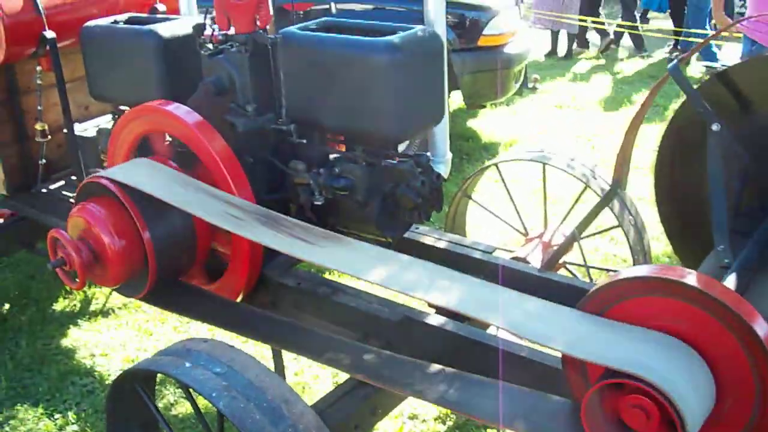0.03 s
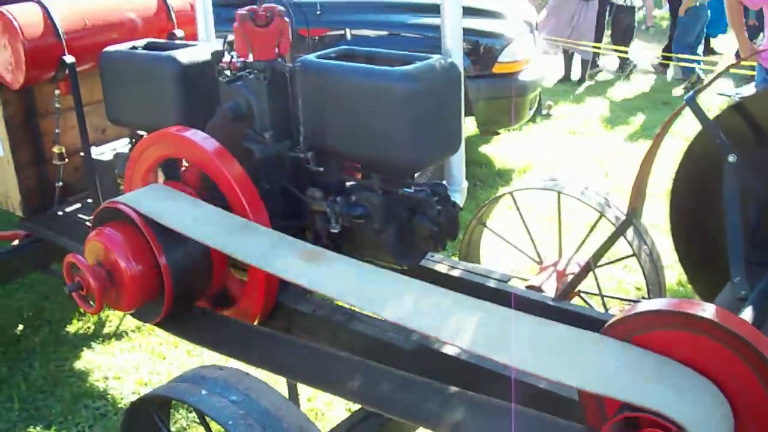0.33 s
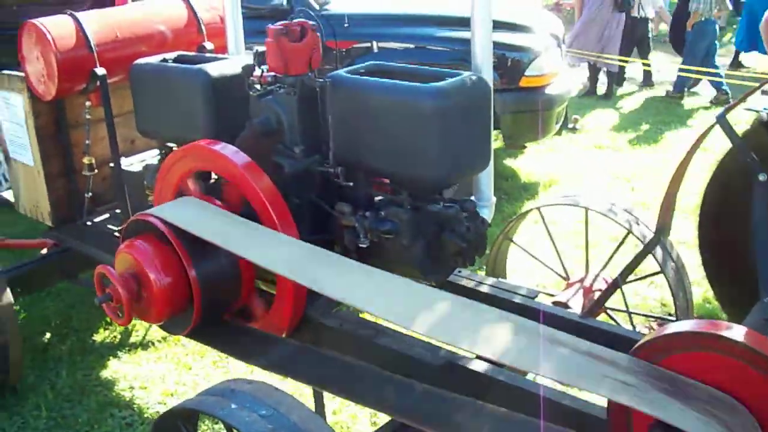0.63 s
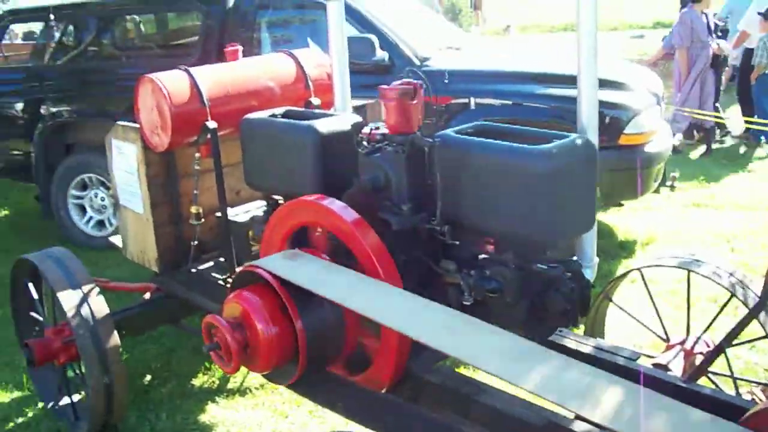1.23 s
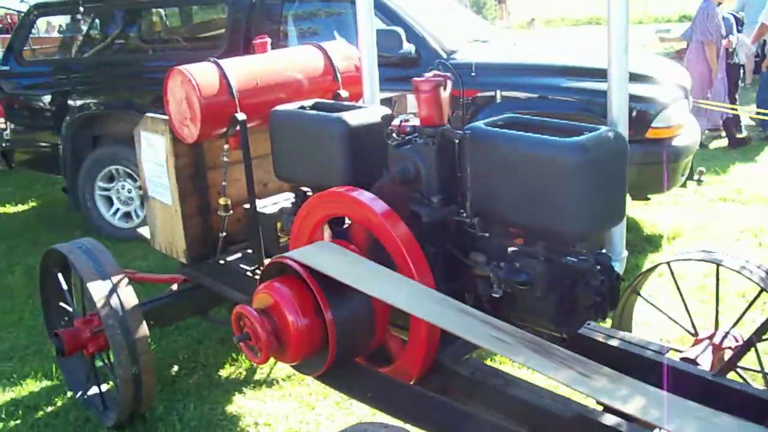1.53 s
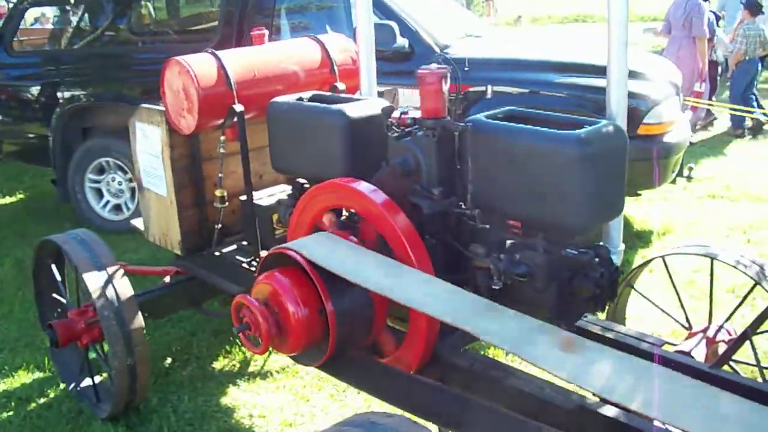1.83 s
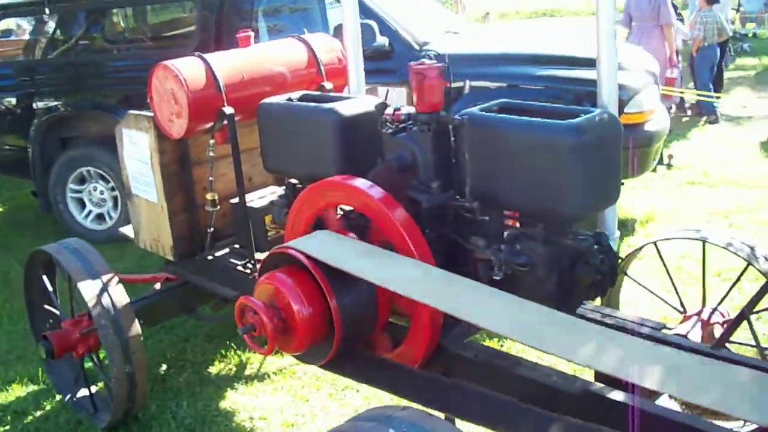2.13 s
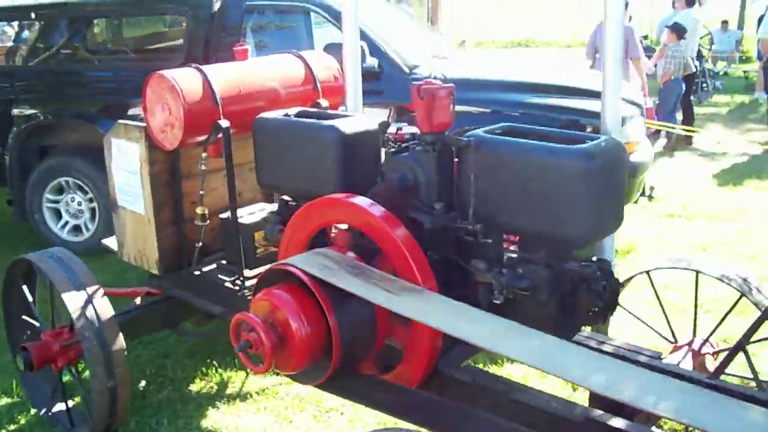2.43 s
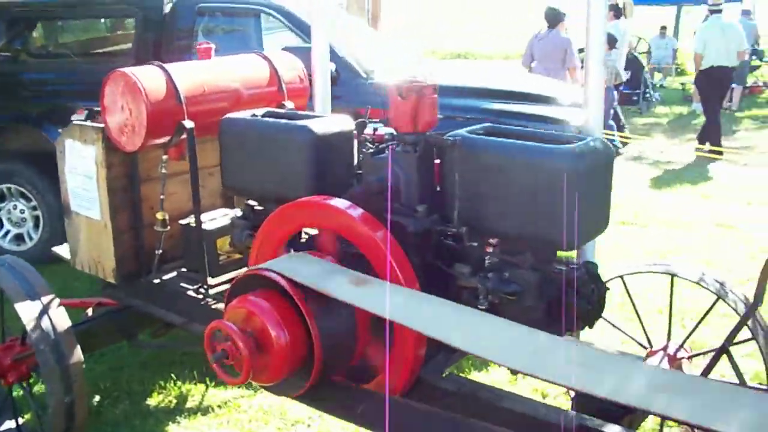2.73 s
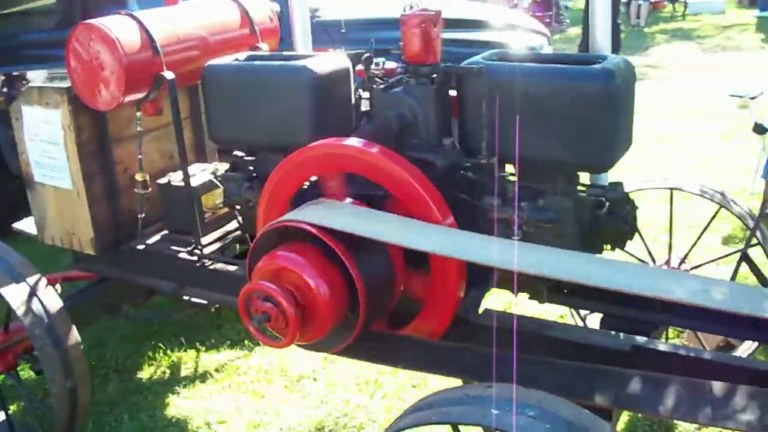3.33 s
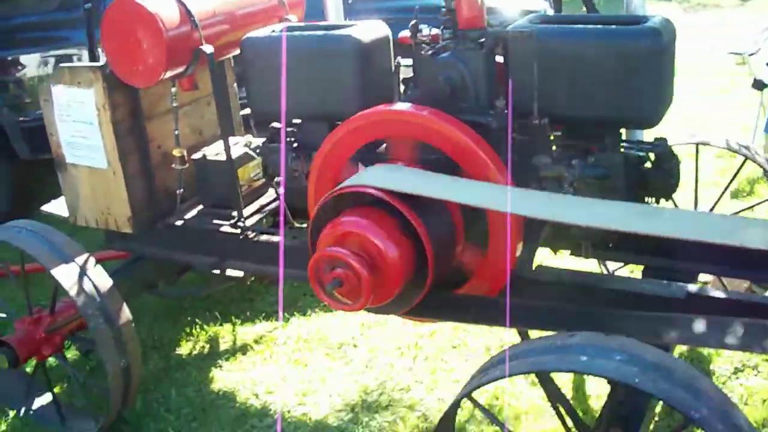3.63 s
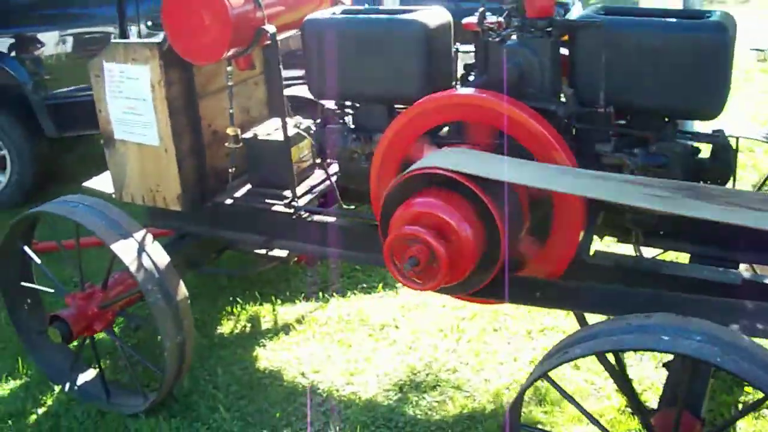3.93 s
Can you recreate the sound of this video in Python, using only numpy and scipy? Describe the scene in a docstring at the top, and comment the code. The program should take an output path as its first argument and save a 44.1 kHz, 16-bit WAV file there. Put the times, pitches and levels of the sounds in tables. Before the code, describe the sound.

An old single-cylinder engine chugs close by outdoors, with sharp, regular cracks and clatter.

```python
"""An old single-cylinder engine chugs close by in a field, driving a flat belt at about 400 turns a minute.
From the start the machinery whirrs and wind buffets the microphone. Each turn leads in with a clack of
gear, a rasp and a hiss of air; then the stroke lands as a low, rising boom and a sharp crack that rings
the iron. Strong and weak turns alternate, the weak ones with a faint whistle. Scrapes and low flutters
come and go, loose gear knocks later on, and a few cracks all but drop out."""
import sys
import numpy as np
from scipy import signal
from scipy.io import wavfile
from scipy.ndimage import uniform_filter1d

SR = 44100
rng = np.random.default_rng(int(sys.argv[2]) if len(sys.argv) > 2 else 0)


def waveform_to_disk(signal):
    """Save audio, clipped to [-1, 1], as 16-bit WAV at the path in sys.argv[1]."""
    frames = np.transpose(np.atleast_2d(signal))
    scaled = np.clip(frames, -1, 1) * 32767
    samples = np.round(scaled).astype(np.int16)
    wavfile.write(sys.argv[1], SR, samples)


N = 176400

# Cue sheet, one row per crank turn, strong then weak: stroke_s, crack_db, boom_db, rasp_db, hiss_db
TURNS = [(0.0379, -16, -21, -27, -25.5), (0.1888, -25.5, -23.5, -25.5, -32.5),
         (0.3297, -15, -28.5, -25.5, -27), (0.4845, -29.5, -23.5, -29.0, -31.5),
         (0.6223, -13.5, -21, -23.0, -29.5), (0.7741, -17.0, -20.5, -26, -34),
         (0.9174, -16, -19.5, -27.5, -32), (1.0675, -21, -16.5, -21.5, -32),
         (1.2112, -15.5, -24.0, -24, -40), (1.3601, -21, -18, -24.5, -29.5),
         (1.5052, -13.5, -23.5, -26.5, -31.5), (1.6565, -23.5, -18.5, -24.5, -31),
         (1.7985, -12.5, -21.5, -25, -29.5), (1.949, -21.5, -17.0, -30, -35),
         (2.0928, -15.5, -24, -32, -31.5), (2.2454, -32, -19.5, -23.5, -30),
         (2.3881, -12.5, -25.0, -22.5, -27.5), (2.539, -13.5, -22, -24, -30.0),
         (2.6832, -17.5, -21.5, -34.5, -33), (2.8338, -20.5, -20.5, -30.5, -29.5),
         (2.975, -13.5, -22, -23.5, -26), (3.1281, -23.0, -20, -25, -27.5),
         (3.2707, -18.5, -21, -24.5, -29.5), (3.4203, -27, -20.5, -24.5, -29.5),
         (3.5668, -15.5, -22, -23.5, -28), (3.72, -30, -21.5, -26, -32), (3.862, -27, -25.5, -28, -27.5),
         (4.012, -32.0, -24.0, -23, -30)]
# Envelopes around a stroke, strong turn then weak: offset_s, attack_s, hold_s, t60_s, trim_db
CLACK_SHAPES = [
    [(-.058, .003, 0.0027, 0.1, -23.5), (.010, 0.0016, 0.004, 0.053, -30),
     (.027, .002, 0.0027, 0.032, -34.5)],
    [(-.067, 0.0034, 0.0036, 0.087, -26.5), (.016, .005, 0.0027, 0.18, -26.5)],
]  # several clacks per turn
RASP_SHAPE = [(-.05, 0.0056, 0.0067, 0.18, 0.64), (-.049, .003, 0.0041, 0.27, -1.6)]
HISS_SHAPE = [(-.052, 0.021, 0.046, 0.048, 0.027), (-.05, 0.034, 0.018, 0.17, 0.02)]
PUFF_SHAPE = [(-.0055, .0015, .008, .03, -22), (-.006, .002, .006, .04, -30)]
CRACK_SHAPE = [(-.0008, .001, .0048, .018, 1), (-.0005, .0012, .0038, .018, .5)]
# EQ curves of the noise layers: frequency_hz, gain_db
WHIRR_EQ = [(30, 2.5), (90, 6.5), (150, 2), (250, -7), (450, -4), (600, -2), (1100, -1), (1600, -5.5),
            (3000, -8), (5000, -9.5), (7000, -18), (8500, -21)]
WIND_EQ = [(5, -5), (20, -5), (40, 0), (70, -8), (120, -13.5), (250, -29), (600, -45.5)]
CLACK_EQ = [(200, -4.5), (700, 1), (1400, 2), (2200, 1.5), (3400, -1), (4200, -2), (5200, -5), (6500, -7),
            (8000, -15)]
RASP_EQ = [(80, -5.5), (250, -0.5), (550, 0.5), (800, -3), (1300, -3), (2200, -1), (3000, -5.5),
           (4500, -20), (8000, -23.5)]
HISS_EQ = [
    [(100, -1.5), (200, 0.5), (500, 5), (1200, 6), (2500, -9.5), (3500, 3), (5000, -2.5), (6000, -4),
     (7300, -3), (8500, -10)],
    [(100, 1), (200, 3), (500, 3), (1200, 2.5), (2500, -7.5), (4000, 4.5), (4800, -2), (5600, -3),
     (7300, -8.5), (8500, -13)],
]  # strong curve, weak curve
PUFF_EQ = [(60, -6.5), (190, 4), (300, -1.5), (550, -4), (900, -3), (1500, -1.5), (3000, -15), (5000, -8.5),
           (8000, -30.5)]
CRACK_EQ = [(150, -14), (600, -20.5), (1200, -7.5), (1700, -0.5), (2400, 0), (3400, -2), (4600, -6.5),
            (6000, -18.5), (8000, -17.5)]
SCRAPE_EQ = [(500, -12.5), (1500, -1.5), (3000, -1), (4500, -2), (6000, 2), (7500, 1), (8600, -6)]
FLUTTER_EQ = [(50, -9.5), (90, 1), (130, 4), (190, -7), (260, -14.5), (500, -36.5), (1000, -69)]
# Resonances of the iron body and its tanks: centre_hz, width_hz, lift_db
BODY_RESONANCES = [(283.6, 37, 4.5), (351, 33, 5.5), (540.7, 33, 7), (590.7, 35, 7), (762, 40, 7),
                   (1088, 64, 4.5), (1730, 38, 1.5), (2460, 58, 3.5), (3320, 150, 2)]
# Fader ride of the wind: time_s, level_db
WIND_RIDE = [(0, -20), (.25, -24), (.4, -23), (.6, -21), (.9, -20), (1.3, -24.5), (1.48, -19), (1.7, -22),
             (1.97, -26.5), (2.3, -19.5), (2.55, -28), (2.95, -24), (3.08, -26.5), (3.24, -22), (3.42, -20),
             (3.65, -33), (3.8, -15.5), (4, -28.5)]
# Single low thuds: centre_s, width_s, peak_amplitude
THUDS = [(.194, .004, -0.26), (0.596, .002, -.25), (.617, 0.00156, -0.32), (.895, 0.0036, -0.27),
         (1.473, 0.0039, 0.23), (1.966, 0.0032, 0.069), (3.224, 0.006, 0.42), (3.92, 0.0022, -0.56)]
# Iron modes that ring on after a crack: pitch_hz, level_db, t60_s
IRON_MODES = [(840, -20, 0.03), (1738, -9.5, 0.069), (2356, -9, 0.067), (2837, -6.5, 0.049),
              (3264, -13, 0.094), (4020, -10, 0.021)]
# Dry scrapes, probably the belt on its pulleys: start_s, length_s, level_db
SCRAPES = [(.148, 0.032, -31.5), (.535, 0.018, -30.5), (0.762, 0.033, -29), (1.413, 0.038, -25.5),
           (2.047, 0.03, -23), (2.645, 0.037, -26), (3.854, 0.076, -25.5)]
# Short low flutters: start_s, length_s, level_db
FLUTTERS = [(.15, 0.071, -21), (.55, 0.093, -19.5), (1.135, 0.086, -23.5), (1.77, 0.044, -32.5),
            (1.91, .12, -22.5), (2.72, 0.055, -25.5), (2.89, 0.052, -26)]
# Knocks of loose gear: start_s, level_db
KNOCKS = [(1.731, -22.5), (2.3, -32.5), (1.884, -26), (3.651, -38)]

STRONG, WEAK = 0, 1
WHIRR_GRAIN_DB, CLATTER_GRAIN_DB, CRACK_GRAIN_DB = 2.5, 2, 1.5
EDGE_HZ = 8900  # the treble falls away above this


def amp(db):
    """Decibels to gain."""
    return 10 ** (np.asarray(db) / 20)


def unit(x):
    """Scales to rms 1."""
    return x / np.sqrt(np.mean(x ** 2) + 1e-20)


def add(mix, s, sound):
    """Drops a sound into the mix at s seconds, trimming any overhang."""
    at = round(s * SR)
    sound = sound[max(-at, 0):]
    part = mix[max(at, 0):][:len(sound)]
    part += sound[:len(part)]


def colour(x, eq, size=8192):
    """Applies an EQ curve plus the body resonances as one minimum-phase filter of unit power."""
    hz = np.fft.rfftfreq(size, 1 / SR)
    eq_hz, eq_db = np.transpose(eq)
    db = np.interp(np.log(hz + 1), np.log(eq_hz), eq_db) - 40 * np.clip(hz / EDGE_HZ - 1, 0, 1)
    db += sum(lift / (1 + (2 * (hz - centre) / width) ** 2) for centre, width, lift in BODY_RESONANCES)
    log_gain = np.log(amp(np.concatenate([db, db[-2:0:-1]])))
    response = np.exp(np.conj(signal.hilbert(log_gain)))
    taps = np.fft.ifft(response).real[:size // 2]
    return signal.oaconvolve(x, taps / np.linalg.norm(taps))[:len(x)]


def grit(grain_db):
    """Grainy noise, in clumps a millisecond or two long."""
    clumps = unit(uniform_filter1d(rng.standard_normal(N), 70))
    return unit(rng.standard_normal(N) * amp(grain_db * clumps))


def bursts(times, levels_db, shape):
    """Gain curve that fires one attack-hold-release envelope at every cue."""
    offset, attack, hold, t60, trim_db = shape
    out, t = np.zeros(N), np.arange(SR // 4) / SR
    envelope = np.minimum(t / attack, 1) * amp(trim_db - 60 * np.maximum(t - attack - hold, 0) / t60)
    for s, db in zip(times, levels_db):
        add(out, s + offset, amp(db) * envelope)
    return out


def swells(cues):
    """Gain curve of soft-edged swells."""
    out = np.zeros(N)
    for s, length, db in cues:
        add(out, s, amp(db) * signal.windows.tukey(round(length * SR), .5))
    return out


def whirr(level_db=-32.5):
    """Belt and wheels lay down a steady, grainy bed."""
    return amp(level_db) * colour(grit(WHIRR_GRAIN_DB), WHIRR_EQ)


def wind():
    """Air buffets the microphone: a lumpy rumble with a few separate thuds."""
    t = np.arange(N) / SR
    ride = amp(np.interp(t, *np.transpose(WIND_RIDE)))
    rumble = unit(colour(rng.standard_normal(N), WIND_EQ)) * ride
    return rumble + sum(peak * np.exp(-((t - s) / width) ** 2) for s, width, peak in THUDS)


def clatter(kind, spread_db=2.5):
    """Moving gear clacks, with a rasp and a hiss of air, at set points of each strong or weak turn."""
    times, _, _, rasp_db, hiss_db = np.array(TURNS)[kind::2].T
    clacks = sum(bursts(times, spread_db * rng.standard_normal(len(times)), shape)
                 for shape in CLACK_SHAPES[kind])
    rasps = bursts(times, rasp_db, RASP_SHAPE[kind])
    hisses = bursts(times, hiss_db, HISS_SHAPE[kind])
    layers = [(clacks, CLACK_EQ), (rasps, RASP_EQ), (hisses, HISS_EQ[kind])]
    return sum(colour(grit(CLATTER_GRAIN_DB) * gain, eq) for gain, eq in layers)


def booms(pitch_hz=49, glide_hz_per_s=420, length_s=.16, fall_20db_s=.32, trim_db=3):
    """Each stroke kicks a low air resonance whose pitch climbs as it dies away."""
    kick_db, kick_width_s, lead_s, fade_s = (-20, -23), .0072, .0025, .047
    quarter_cycle = 1 / (4 * pitch_hz)
    out, t = np.zeros(N), np.arange(-quarter_cycle, length_s, 1 / SR)
    sweep = np.cos(2 * np.pi * (pitch_hz * t + glide_hz_per_s * t ** 2 / 2))
    fade = np.clip((length_s - t) / fade_s, 0, 1)
    kick = np.exp(-((t - quarter_cycle) / kick_width_s) ** 2)  # extra punch on the first swing
    for turn, (s, _, boom_db, _, _) in enumerate(TURNS):
        envelope = amp(boom_db + trim_db - 20 * t / fall_20db_s) + amp(kick_db[turn % 2]) * kick
        add(out, s - lead_s, envelope * fade * sweep)
    return out


def cracks(kind, slap_gain=.6, slap_delay_s=(.0007, .0017)):
    """A dull puff, then the stroke's hard crack, recoloured each time by one close reflection."""
    times, crack_db = np.array(TURNS)[kind::2, :2].T
    noise, crack = grit(CRACK_GRAIN_DB), np.zeros(N)
    for s, db in zip(times, crack_db):
        direct = noise * bursts([s], [db], CRACK_SHAPE[kind]) / np.hypot(1, slap_gain)
        crack += direct
        add(crack, rng.uniform(*slap_delay_s), slap_gain * direct)
    accent_db = (crack_db - np.median(crack_db)) / 2  # puffs follow the cracks at half the range
    puff = grit(CRACK_GRAIN_DB) * bursts(times, accent_db, PUFF_SHAPE[kind])
    return colour(crack, CRACK_EQ) + colour(puff, PUFF_EQ)


def iron_pings(delay_s=.002038, attack_s=.00061, spread_db=5.5, detune_spread=.012):
    """Every crack strikes the iron, each time with a slightly different mix of modes."""
    out, t = np.zeros(N), np.arange(SR // 5) / SR
    hz, db, t60 = np.transpose(IRON_MODES)[:, :, None]
    attack = np.minimum(t / attack_s, 1)
    for s, crack_db, _, _, _ in TURNS:
        strength, detune, phase = rng.standard_normal((3, len(IRON_MODES), 1))
        decays = amp(db + spread_db * strength - 60 * t / t60)
        tones = np.sin(2 * np.pi * (hz * (1 + detune_spread * detune) * t + phase))
        add(out, s + delay_s, amp(crack_db) * attack * (decays * tones).sum(0))
    return out


def whistle(pitch_hz=4750, width_hz=330):
    """Air sings faintly through a narrow opening on every weak turn, riding the level of the hiss."""
    times, _, _, _, hiss_db = np.array(TURNS)[WEAK::2].T
    shape = (-.047, .0099, .037, .09, -5.5)  # offset_s, attack_s, hold_s, t60_s, trim_db
    resonance = signal.iirpeak(pitch_hz, pitch_hz / width_hz, SR)
    airy_tone = unit(signal.lfilter(*resonance, rng.standard_normal(N)))
    return airy_tone * bursts(times, hiss_db, shape)


def stray_noises():
    """Spot effects outside the beat: dry scrapes, low flutters and knocks of loose gear."""
    knock_shape = (0, .0049, .021, .053, 0)  # offset_s, attack_s, hold_s, t60_s, trim_db
    knocks = bursts(*np.transpose(KNOCKS), knock_shape)
    layers = [(swells(SCRAPES), SCRAPE_EQ), (knocks, CLACK_EQ), (swells(FLUTTERS), FLUTTER_EQ)]
    return sum(colour(grit(CLATTER_GRAIN_DB) * gain, eq) for gain, eq in layers)


def scene():
    """The mono mix: the engine up front, over the whirr and the wind."""
    bed = whirr()
    chug = sum(cracks(kind) + clatter(kind) for kind in (STRONG, WEAK))
    engine = chug + iron_pings() + booms() + whistle() + stray_noises()
    return (engine + bed + wind())[None]


def record(dry, rolloff_hz=8100, clip_level=.72, top_hz=15850):
    """A small microphone with little top; the loudest cracks overload it and spit extra treble."""
    gentle_cut = signal.firwin(61, rolloff_hz, fs=SR)[None]
    steep_cut = signal.firwin(301, EDGE_HZ, window=("kaiser", 8), fs=SR)[None]
    top_cut = signal.firwin(301, top_hz, window=("kaiser", 8), fs=SR)[None]
    softened = signal.oaconvolve(dry, gentle_cut, "same")
    dark = signal.oaconvolve(softened, steep_cut, "same")
    clipped = np.clip(dark, -clip_level, clip_level)
    return signal.oaconvolve(clipped, top_cut, "same")


dry = scene()
out = record(dry)
waveform_to_disk(out)
```